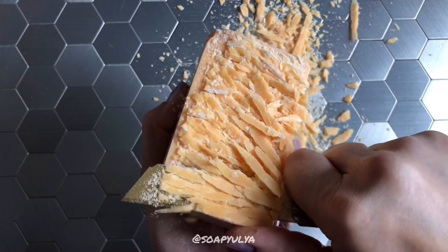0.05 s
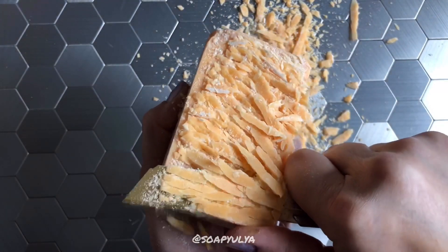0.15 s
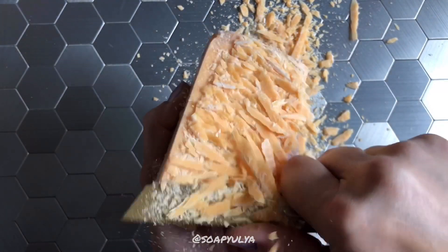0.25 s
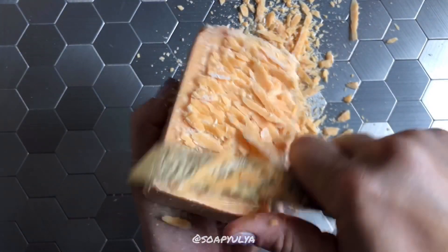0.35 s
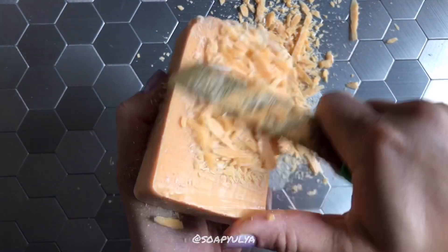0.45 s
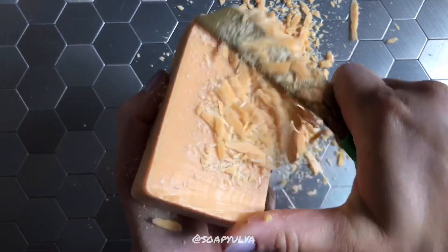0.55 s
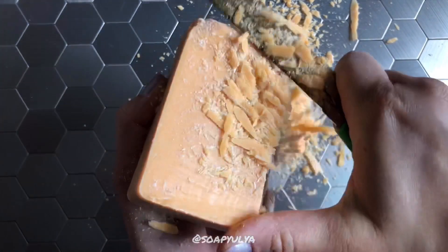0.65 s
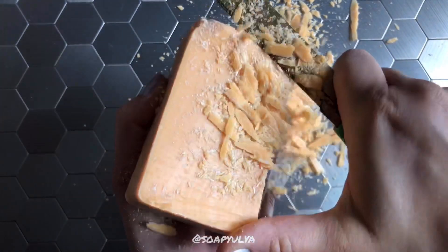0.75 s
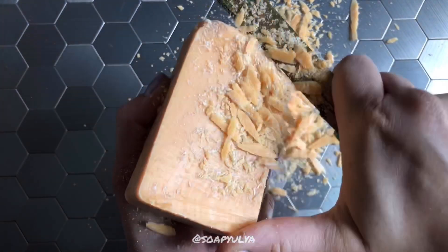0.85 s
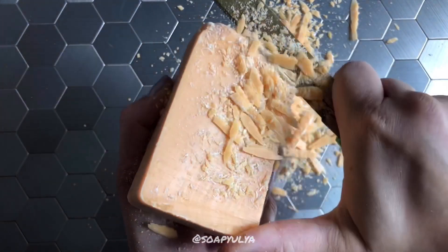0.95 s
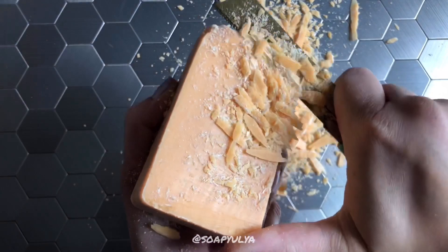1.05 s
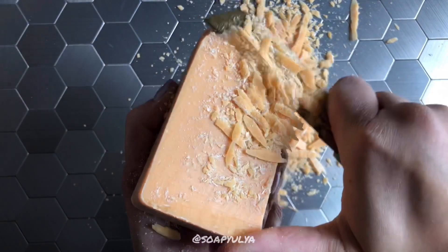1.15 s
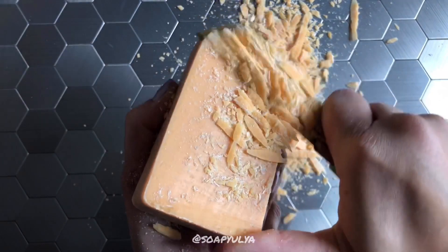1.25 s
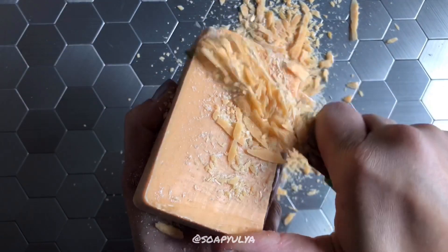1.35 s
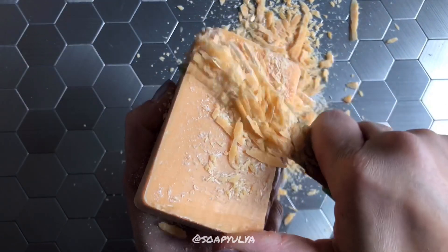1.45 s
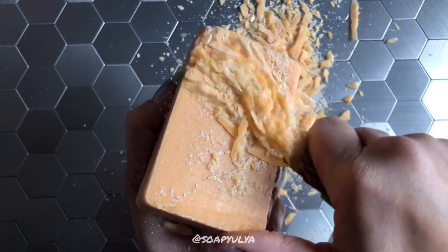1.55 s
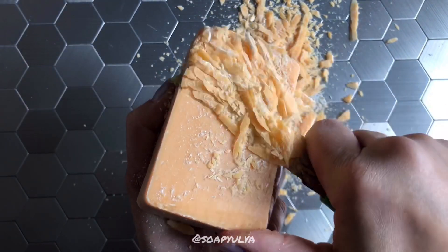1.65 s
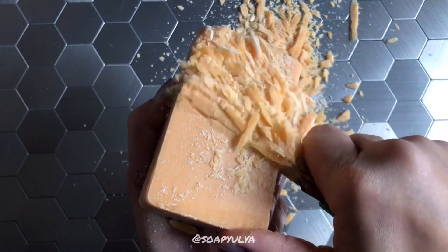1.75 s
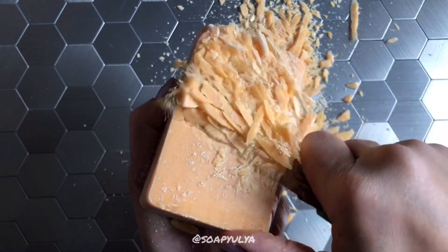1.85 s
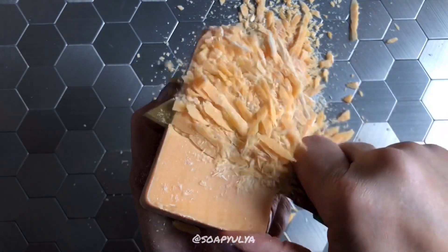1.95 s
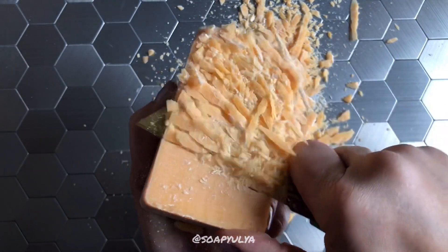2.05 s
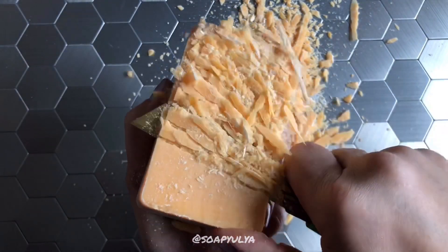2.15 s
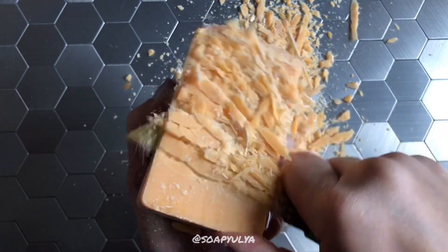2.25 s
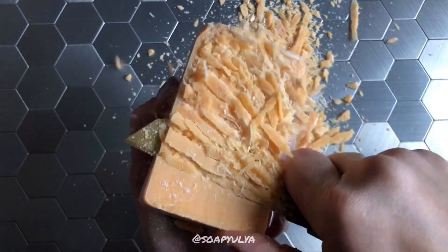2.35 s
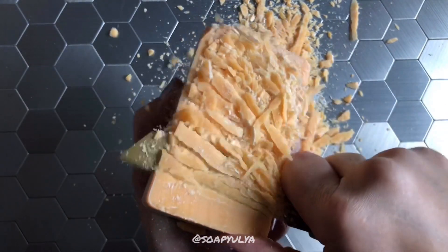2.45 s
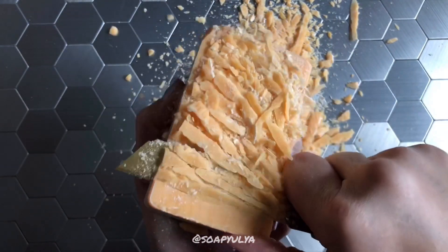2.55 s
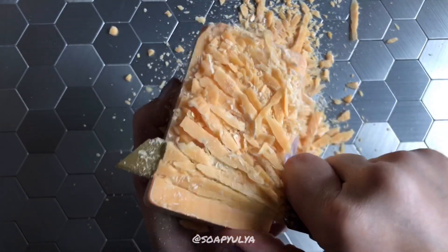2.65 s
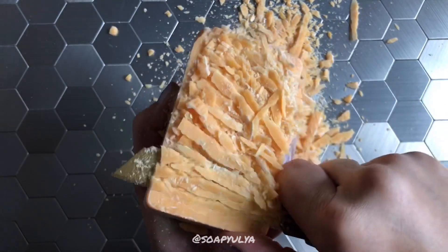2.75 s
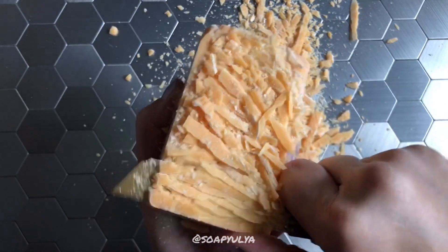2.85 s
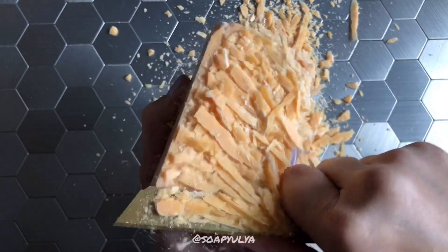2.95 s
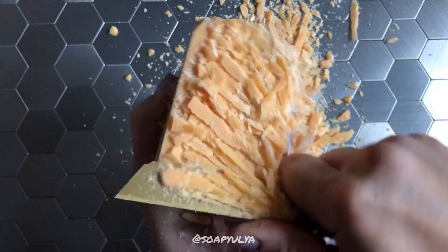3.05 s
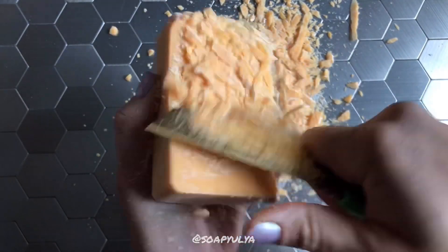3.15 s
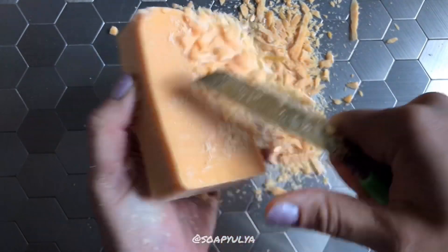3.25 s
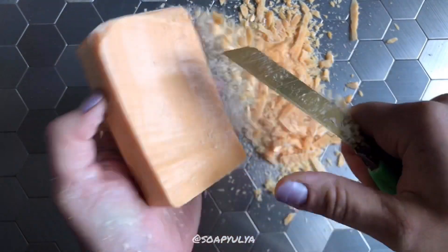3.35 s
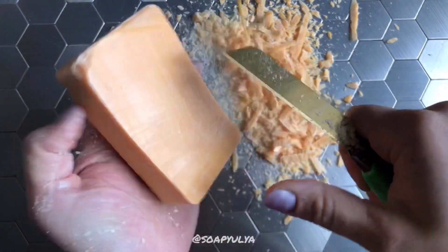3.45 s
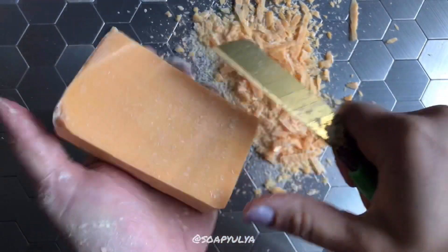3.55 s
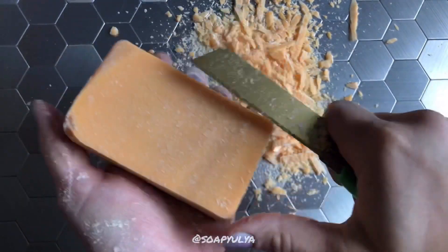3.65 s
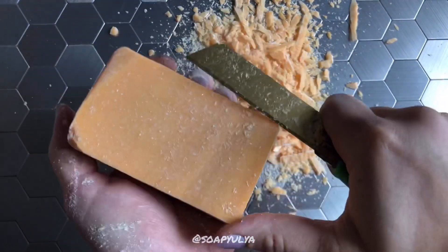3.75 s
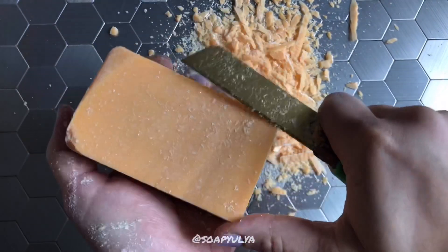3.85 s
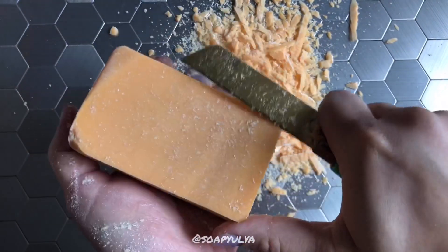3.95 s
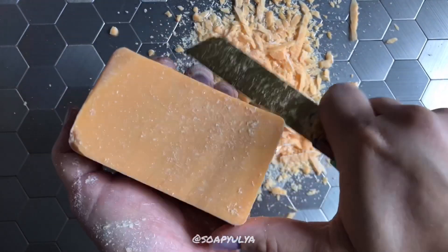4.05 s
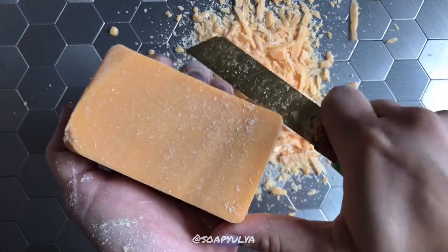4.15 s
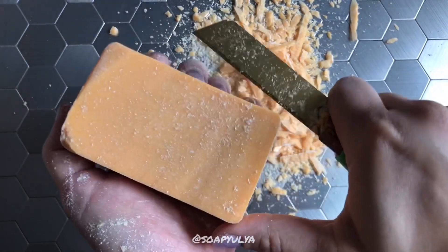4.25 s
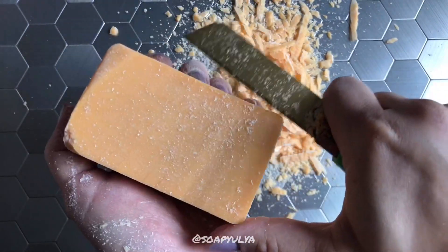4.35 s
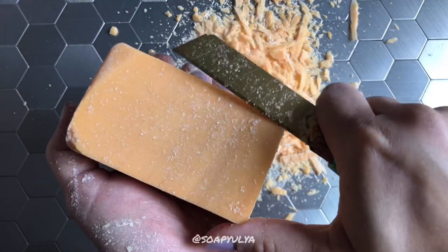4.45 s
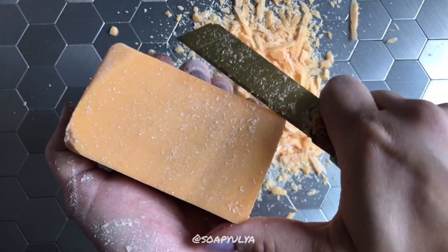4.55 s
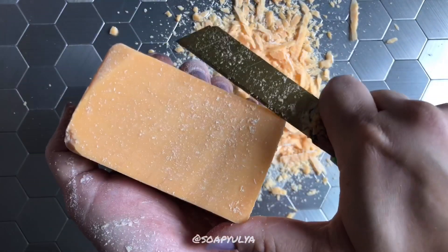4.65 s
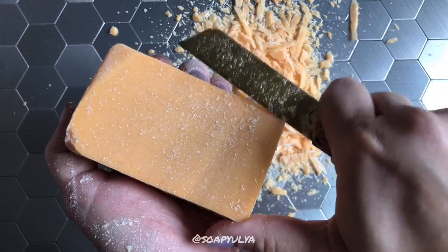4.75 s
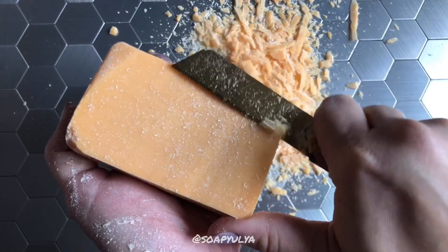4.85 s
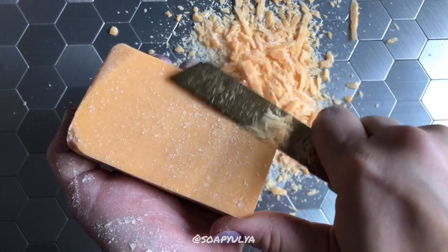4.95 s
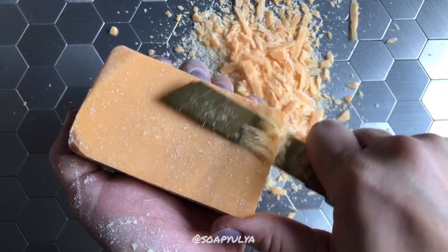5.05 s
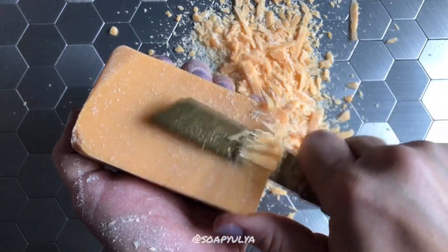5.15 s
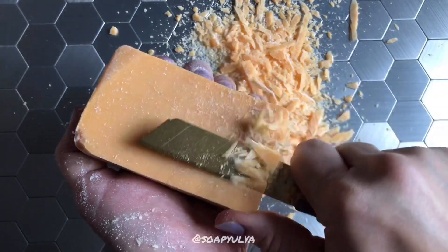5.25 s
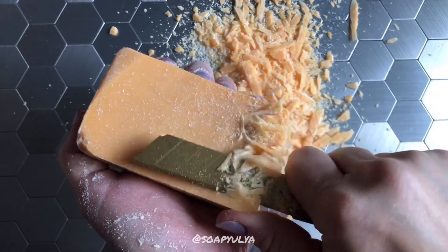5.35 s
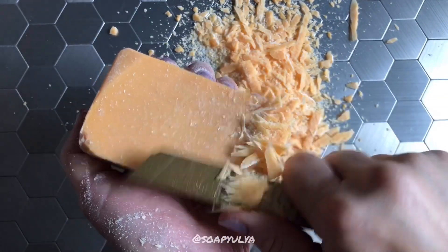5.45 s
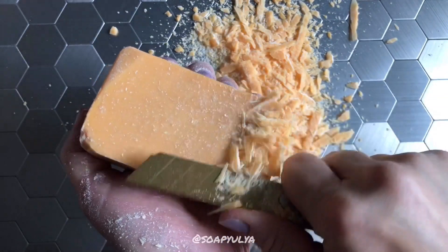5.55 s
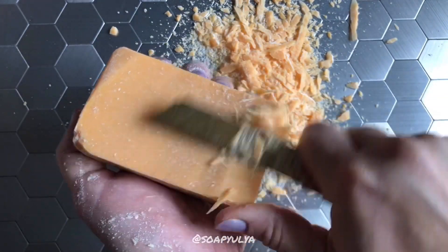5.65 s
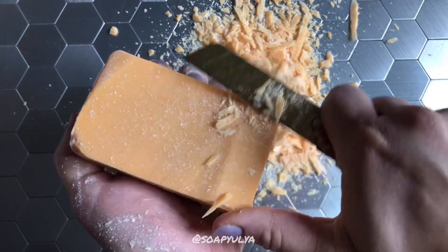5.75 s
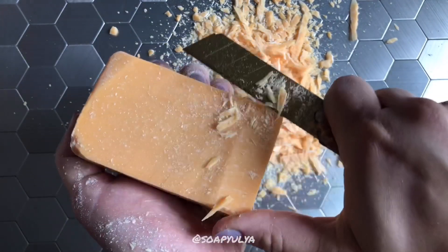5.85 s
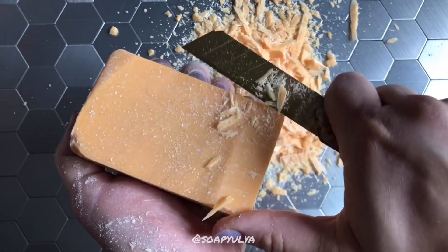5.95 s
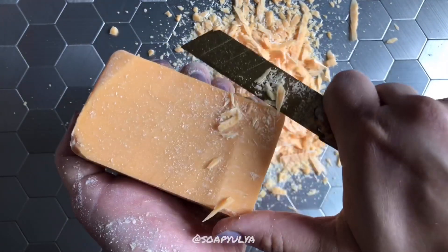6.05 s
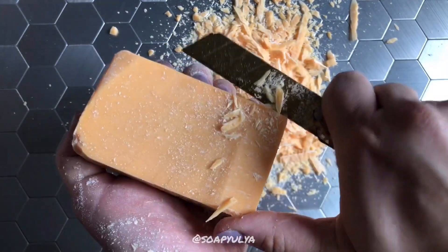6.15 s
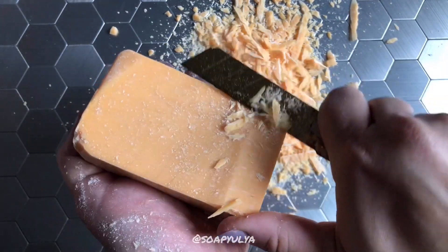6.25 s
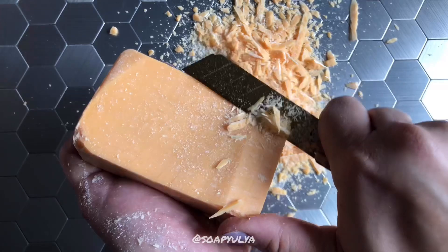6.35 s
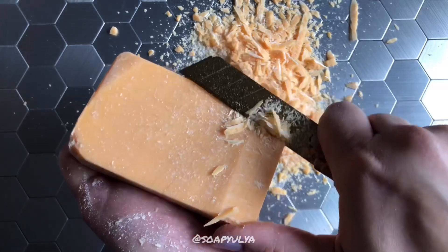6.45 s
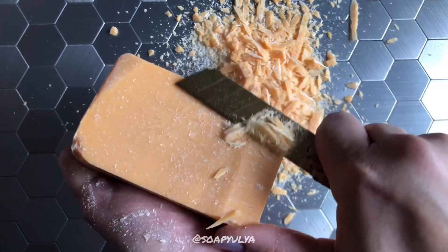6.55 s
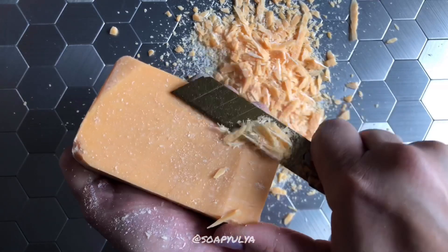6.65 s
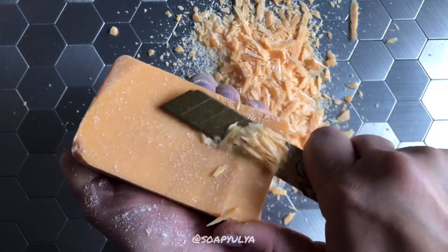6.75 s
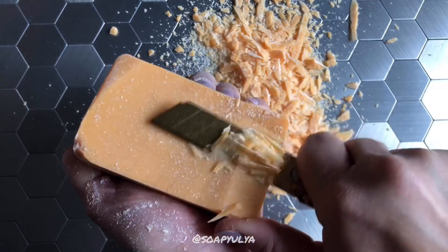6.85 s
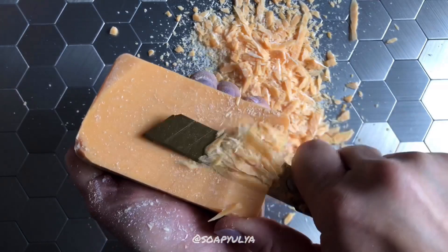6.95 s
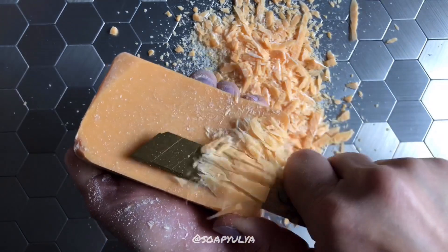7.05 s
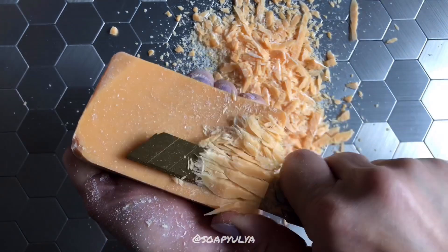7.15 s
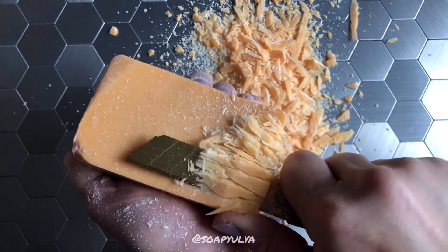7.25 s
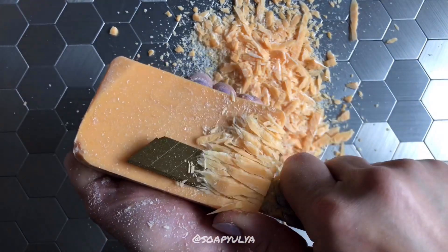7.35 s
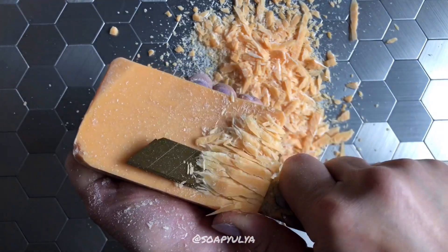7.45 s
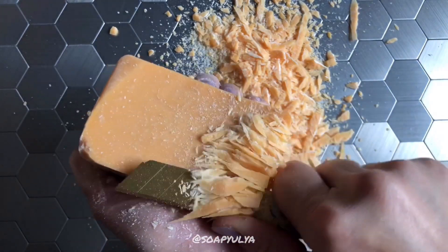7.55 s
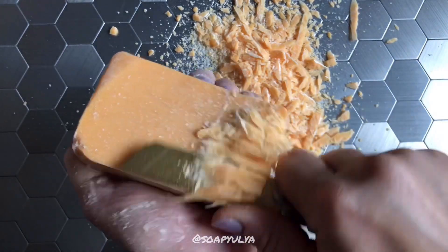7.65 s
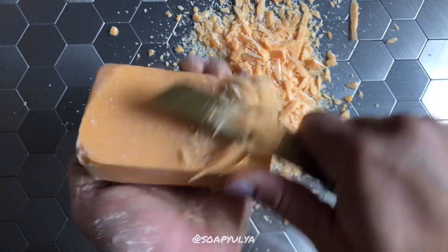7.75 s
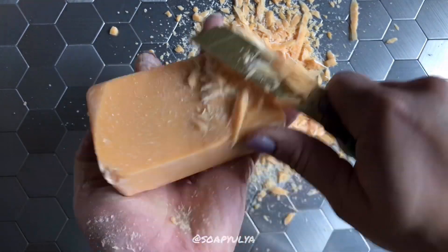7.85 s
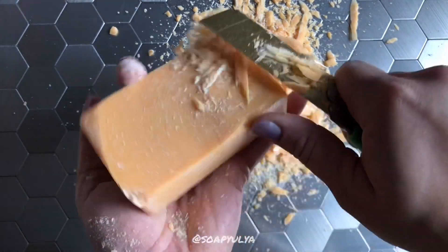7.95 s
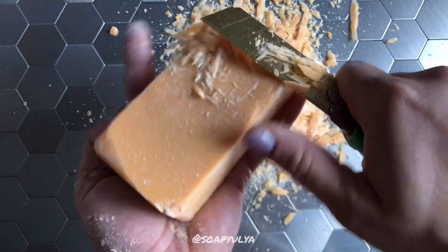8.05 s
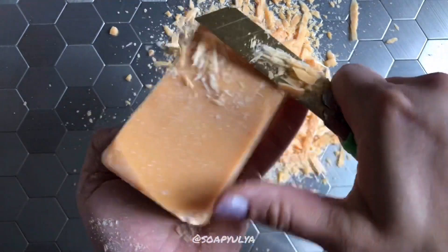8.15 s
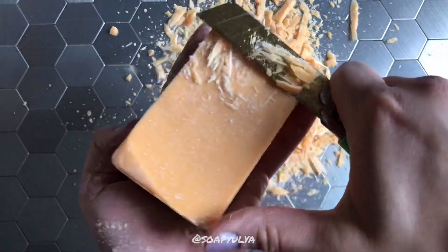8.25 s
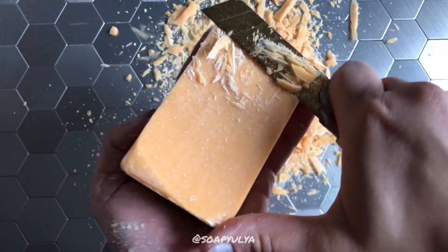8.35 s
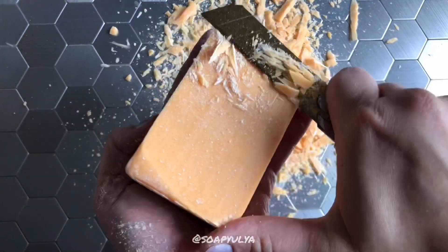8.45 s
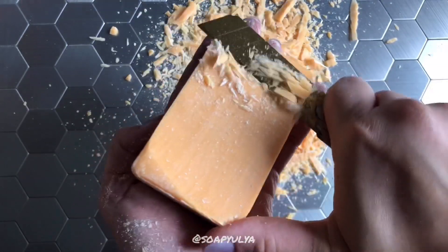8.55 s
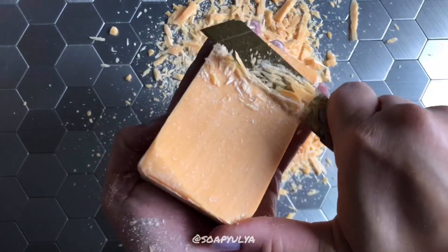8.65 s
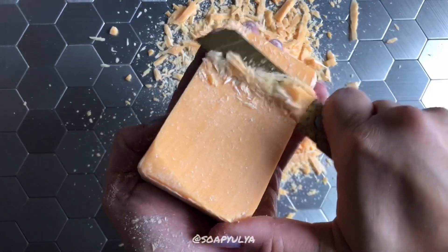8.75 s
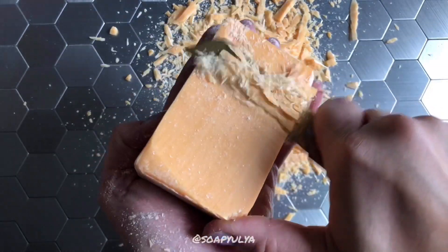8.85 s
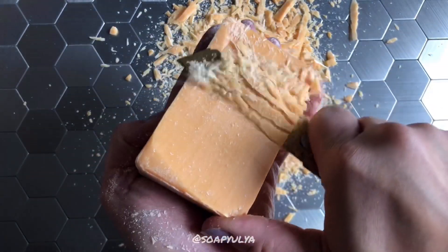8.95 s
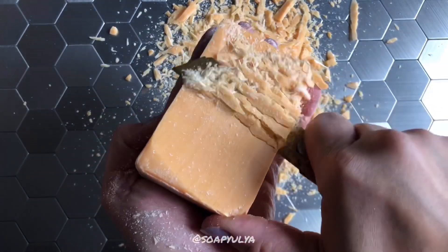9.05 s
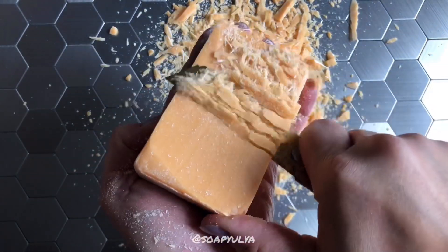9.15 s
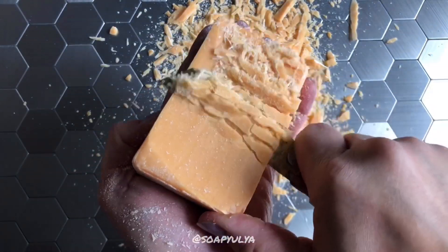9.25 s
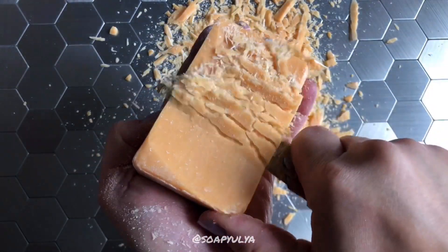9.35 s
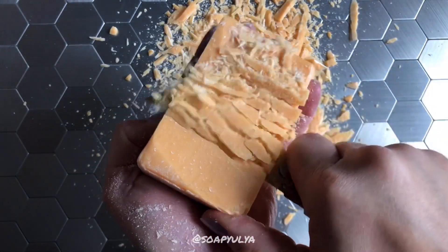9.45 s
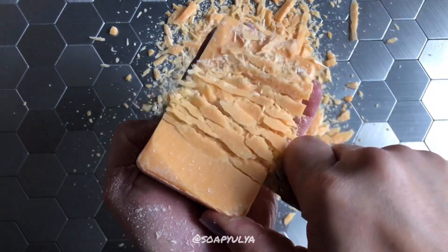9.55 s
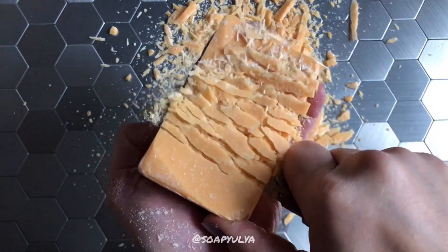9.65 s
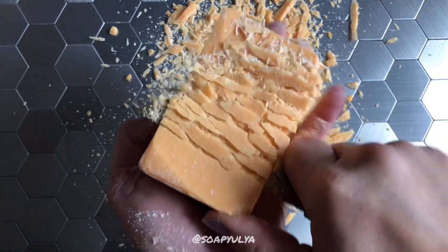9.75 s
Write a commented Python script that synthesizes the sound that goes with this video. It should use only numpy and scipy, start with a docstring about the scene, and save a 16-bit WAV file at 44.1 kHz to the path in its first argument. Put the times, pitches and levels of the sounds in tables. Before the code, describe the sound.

Close, dry and detailed: brittle soap snaps in clusters of tiny sharp cracks, coloured by a short metallic blade ring. Gritty scraping and falling crumbs fill the strokes; between them are swishing flake sweeps, light taps and dull hand rubs. Three main crackling passages are separated by quiet gaps, with faint arm thuds, a brief low hum and a very short room reflection behind.

```python
"""A quiet room, microphone close to a hard, dry soap bar that a thin steel blade shaves.
The soap lets go in short cracks: bursts of tiny fractures, heard through the soap and the ringing blade.
Between them come scraping grit, ticking flakes, quick rasping sweeps and dull rubs of the hands.
Behind are a low noise murmur, soft thuds of the arms and a wavering sine hum that comes and goes.
The walls add a short noise tail to the knife, mixed from two by a slowly wandering angle."""
import sys
import numpy as np
from scipy import signal
from scipy.fft import rfft, irfft, next_fast_len
from scipy.io import wavfile
from scipy.ndimage import uniform_filter1d, map_coordinates

SR = 44100
rng = np.random.default_rng(int(sys.argv[2]) if len(sys.argv) > 2 else 0)


def waveform_to_disk(signal):
    """Save audio, clipped to [-1, 1], as 16-bit WAV at the path in sys.argv[1]."""
    frames = np.transpose(np.atleast_2d(signal))
    scaled = np.clip(frames, -1, 1) * 32767
    samples = np.round(scaled).astype(np.int16)
    wavfile.write(sys.argv[1], SR, samples)


N = 432180

# Spectrum of the quiet room, relative: [f/Hz, density/dB per Hz]
ROOM_SPECTRUM = [(15, -66), (25, -38), (75, -14), (107, -7.5), (189, -3), (283, -6), (435, -12.5),
                 (526, -11.5), (746, -15), (1180, -22.5), (12300, -36), (14500, -30.5), (15700, -42.5)]
# Slow course of the room noise: [t/s, level/dB]
ROOM_LEVEL = [(0.0, -60), (2.02, -57), (4.37, -62.5), (4.97, -61.5), (7.56, -64), (8.05, -63.5), (9.8, -61)]
# Two low notes the room favours: [f/Hz, width/Hz, level/dB]
ROOM_BOOM = [(188.5, 3.3, 4.5), (284, 17, -9)]
# Dull thuds, stronger while the arms work hard; overlapping rows add: [from t/s, to t/s, level/dB]
ARM_THUDS = [(-.2, 10, -69.5), (1.45, 3.2, -70.5), (4.9, 5.4, -66.5), (6.4, 7.4, -67.5), (8.95, 9.4, -70.5)]
# When the hum is heard: [from t/s, to t/s, level/dB]
HUM_SPANS = [(-.2, 0.82, -62), (1.32, 2.1, -60.5)]
# Decay of the room's answer: [f/Hz, time to fall 60 dB/s]
WALL_DECAY = [(500, 0.18), (2000, 0.22), (5000, 0.091), (14000, 0.11)]
# Palms and fingers shifting on the bar: [from t/s, to t/s, pitch f/Hz, level/dB before the fades]
GRIP_SHIFTS = [(.49, 0.58, 443, -56.5), (0.732, 0.822, 420, -49.5), (0.879, 0.919, 480, -53),
               (1.527, 1.6, 300, -56), (2.73, 2.8, 209, -48.5), (3.284, 3.333, 410, -55.5),
               (3.377, 3.5, 470, -53), (3.461, 3.553, 208, -52.5), (4.94, 5.048, 480, -60.5),
               (5.918, 5.996, 405, -54), (6.388, 6.438, 540, -58), (8.001, 8.5, 200, -61.5),
               (8.078, 8.2, 442, -61), (8.275, 8.444, 565, -58), (8.884, 8.933, 326, -56.5)]

# Flat of the blade sweeping over flakes, force levels before the envelope:
# [from t/s, to t/s, grit level/dB, low, middle and high ring level/dB, whistle level/dB]
FLAKE_SWEEPS = [(0.406, 0.462, -61, -56.5, -58.5, -58, -57.5), (0.47, 0.548, -45, -48, -44, -52.5, -43.5),
                (0.561, 0.655, -60, -65.5, -47, -64.5, -51), (0.756, 0.833, -51.5, -63, -52, -68, -66.5),
                (3.183, 3.247, -48, -63, -66, -77, -55), (3.398, 3.535, -49, -54, -62, -69, -57),
                (4.86, 4.97, -52, -55, -51, -52, -78), (5.15, 5.174, -39, -48, -46, -32, -64),
                (5.707, 5.79, -48, -57.5, -43, -42, -50), (6.263, 6.41, -59, -58, -49, -52, -82),
                (8.28, 8.329, -58, -51, -43, -70, -76)]
# Strokes of the edge over the bar, force levels before the grit trims:
# [from t/s, firmest t/s, to t/s, grit level/dB, low, middle and high ring level/dB]
EDGE_STROKES = [(0.454, 0.524, .74, -51, -52, -45.5, -65), (0.686, 0.794, .98, -55, -55, -56, -70),
                (1.02, 1.38, 1.74, -51.5, -51.5, -51.5, -48.5), (1.758, 1.904, 2.3, -56.5, -67, -73, -51),
                (2.3, 2.454, 2.84, -62, -65, -67, -60.5), (2.825, 2.986, 3.15, -62, -57, -58.5, -53.5),
                (3.15, 3.452, 3.74, -58, -69, -65, -77), (4.056, 4.113, 4.2, -66, -63, -62, -72),
                (4.85, 5.15, 5.66, -58, -58, -65, -54), (5.702, 5.74, 5.88, -56.5, -50.5, -50, -60),
                (5.87, 5.942, 6.06, -61.5, -74, -73, -66), (6.247, 6.34, 6.52, -68, -63, -64, -60),
                (6.568, 6.68, 7.0, -57, -55, -54.5, -48), (6.86, 7.104, 7.27, -57, -53.5, -67, -49.5),
                (7.302, 7.378, 7.46, -67, -59, -72, -58), (7.568, 7.604, 7.74, -60, -64, -62.5, -65),
                (7.7, 7.817, 8.04, -62.5, -73, -66, -72), (8.057, 8.11, 8.72, -60.5, -70, -57.5, -81),
                (8.66, 8.98, 9.18, -57, -57, -60.5, -53.5), (9.11, 9.464, 9.8, -60.5, -58.5, -64, -52)]
# Soap cracking under the edge, levels before the crack offsets:
# [t/s, peak level/dB, low ring level/dB, middle ring level/dB, time to full strength/ms]
SOAP_CRACKS = [(0.082, -32.5, -45.5, -47, 4.5), (1.1729, -41, -44, -42.5, 6.9),
               (1.2243, -35.5, -35.5, -42, 5.5), (1.2943, -40.5, -41.5, -37, 5),
               (1.3827, -36.5, -40, -46, 6.8), (1.466, -31.5, -45, -45, 4.8), (1.515, -33.5, -46, -46, 5.6),
               (1.5594, -30.5, -35, -31, 4.3), (1.5989, -34, -49, -44, 4.5), (1.6618, -37, -47, -45, 6.2),
               (1.7694, -40, -48.5, -54, 7.4), (1.7905, -24.5, -36.5, -31.5, 3.8),
               (1.8532, -34, -43, -37, 6.4), (1.8836, -28.5, -36.5, -35, 4.3), (1.9134, -30, -55, -41, 1.6),
               (1.9311, -19, -33, -28, 2), (1.9787, -23.5, -39, -34.5, 6.6), (2.1015, -32, -40, -50, 5.1),
               (2.144, -32, -44.5, -38.5, 5.7), (2.2409, -37, -52, -59, 4.1),
               (2.3318, -10.5, -37, -39, 4.4), (2.3674, -32, -48, -39, 6.4), (2.4112, -38, -43, -36, 3.3),
               (2.4913, -26, -43, -39, 5.8), (2.567, -33.5, -54, -54, 7.9), (2.7294, -31, -41.5, -37, 3.3),
               (2.836, -35, -57, -52, 5.7), (2.9044, -39, -66, -66, 3.5), (2.9336, -33, -50, -57, 3.4),
               (2.968, -28, -53, -52, 5.6), (2.9938, -24.5, -36.5, -53, 4.8), (5.0108, -36, -46, -50, 5.6),
               (5.0569, -29, -39, -36, 6.1), (5.1081, -23.5, -37, -36, 5.1), (5.1452, -27.5, -41, -51, 4.5),
               (5.2066, -20, -40, -33, 4.7), (5.2682, -17.5, -39, -33, 5.6), (5.3115, -31.5, -43, -39, 7.9),
               (5.3764, -19, -37, -33, 5.3), (5.4331, -36, -47, -43, 5.1), (5.4893, -27, -40, -43, 5),
               (5.7471, -35.5, -46.5, -34, 8.8), (5.976, -31.5, -54, -53, 3.4),
               (6.6269, -31, -48, -50, 3.8), (6.777, -28, -44, -44, 4), (6.795, -21, -40.5, -35, 6.3),
               (6.8632, -31.5, -43.5, -44, 4.5), (6.9087, -30.5, -43, -45, 6.7),
               (6.9476, -30, -42, -45, 3.5), (6.9656, -31, -46.5, -44, 9.9), (7.0326, -25, -46, -51, 6.5),
               (7.0947, -19.5, -38.5, -40.5, 5.6), (7.3488, -40.5, -54, -66, 4.9),
               (8.6276, -44.5, -52, -43.5, 4.6), (8.7215, -43.5, -53, -47, 5),
               (8.8598, -38.5, -45, -42, 5.1), (8.892, -32.5, -38.5, -43, 11.3),
               (8.9637, -23.5, -31.5, -37, 5.8), (9.0323, -28.5, -37.5, -42, 6.2),
               (9.0774, -32.5, -39, -48, 3.7), (9.2183, -30.5, -41.5, -38, 5.3),
               (9.277, -34, -47.5, -48, 4.2), (9.3472, -30.5, -49, -43, 6.5), (9.4295, -35, -49, -44, 4.8),
               (9.4853, -21, -39, -33, 2.8), (9.5477, -22.5, -45, -39.5, 4.3), (9.62, -36.5, -58, -62, 4.8),
               (9.7224, -31, -50, -57, 7.7)]
# Ticks of flakes and light taps of the blade, levels before the tick offsets:
# [t/s, peak level/dB, low ring level/dB, middle ring level/dB]
FLAKE_TICKS = [(0.0692, -31, -54, -71), (0.4752, -22.5, -49, -41), (0.5029, -28.5, -40, -32),
               (0.614, -30, -60, -34), (0.6374, -35, -55, -44), (0.7521, -34, -40, -46),
               (0.8845, -47, -53, -64), (1.0176, -47, -75, -55), (1.0804, -44, -49, -48.5),
               (2.0285, -30.5, -42, -37), (2.1932, -39, -51, -47), (2.5341, -28.5, -49, -41),
               (2.6063, -30, -48, -43), (2.6504, -31, -52, -58), (2.6703, -34.5, -52, -49),
               (2.793, -40, -64, -67), (3.1816, -33.5, -49, -51), (3.2116, -47, -52, -41),
               (3.2186, -28, -54, -50), (3.247, -35.5, -55, -60), (3.3054, -50.5, -65, -51),
               (3.3383, -43, -66, -51), (3.3675, -37, -52, -58), (3.3971, -30.5, -55, -48),
               (3.4199, -34, -42, -38.5), (3.4639, -27, -46, -45), (3.6017, -44, -40.5, -45.5),
               (3.794, -53, -61, -71), (3.8731, -52, -64, -73), (3.951, -65, -62, -61),
               (4.1239, -27.5, -44.5, -26.5), (4.1675, -40.5, -43, -48), (4.2815, -51.5, -48, -60),
               (4.5124, -52.5, -44, -49.5), (4.6322, -29.5, -61, -38.5), (4.9851, -31, -45, -47),
               (5.0836, -32.5, -45, -41), (5.3323, -29, -45, -33.5), (5.6291, -36.5, -64, -59),
               (5.7262, -32.5, -46, -44), (5.8252, -34, -52, -53), (5.8364, -51.5, -44, -34.5),
               (5.9114, -34.5, -70, -43), (5.9335, -28, -59, -58), (6.039, -44, -50, -45.5),
               (6.2811, -52, -61, -41), (6.345, -34, -43, -39), (6.3616, -38, -47, -34),
               (6.4135, -33, -37, -48), (6.4564, -37.5, -49, -51), (6.5959, -37, -50, -53),
               (7.3174, -52, -55, -73), (7.3983, -41, -51, -64), (7.4594, -56, -58, -70),
               (7.637, -34.5, -49, -39.5), (7.784, -45, -40, -53.5), (8.0895, -37, -46, -45),
               (8.1332, -33.5, -66, -58), (8.1768, -41.5, -43.5, -36.5), (8.2184, -51, -46, -47),
               (8.29, -42, -42, -35.5), (8.3156, -40, -47, -38), (8.3759, -47.5, -36, -51),
               (8.3974, -50, -41, -59), (8.4682, -66, -49.5, -48), (8.5375, -44, -64, -47),
               (8.6124, -41, -54, -51), (9.1505, -35, -60, -64), (9.209, -30.5, -45, -47),
               (9.4688, -26.5, -36, -37), (9.7101, -37, -62, -61)]
# Blade breaking out through the rim at the end of a cut, force levels:
# [t/s, soap level/dB, low, middle and high ring level/dB, time to full strength/ms]
RIM_BREAKOUTS = [(.2745, -23.5, -31.5, -55, -24.5, 5.5), (3.0055, -30, -62, -64, -35, 6.6),
                 (5.56, -32.5, -36.5, -40, -31, 4.5), (7.1429, -30.5, -44, -48, -23, 4.76),
                 (7.585, -31, -40, -50, -21.5, 5.5)]

# Breaking soap without the blade, relative: [f/Hz, density/dB per Hz]
SOAP_SPECTRUM = [(410, -7), (700, -9.5), (1180, -5.5), (2750, -1.5), (4620, 2), (5840, 2), (15700, -6.5)]
# Dull knock of flakes and fingers on the bar: [f/Hz, width/Hz, level/dB]
CRUMB_MODES = [(970, 2100, -5), (2620, 1100, 4.5)]
# Bright rustle of loose flakes and dust: [f/Hz, width/Hz, level/dB]
DUST_MODES = [(13200, 3700, 0)]
# Blade modes, low group: [f/Hz, width/Hz, level/dB]
LOW_MODES = [(901, 143, -4), (1770, 151, 5.5), (2292, 86, -7)]
# Low group when the blade only touches: [f/Hz, width/Hz, level/dB]
FREE_LOW_MODES = [(916, 130, -0.5), (2040, 120, 3)]
# Blade modes, middle group: [f/Hz, width/Hz, level/dB]
MIDDLE_MODES = [(3140, 340, 22), (3396, 120, 15), (4010, 290, 5.1), (9060, 250, 0.5)]
# Middle group when the blade only touches: [f/Hz, width/Hz, level/dB]
FREE_MIDDLE_MODES = [(2230, 410, -9.5), (3358, 120, 7), (3500, 260, -1.5)]
# Blade modes, high group: [f/Hz, width/Hz, level/dB]
HIGH_MODES = [(5490, 310, -0.5), (6042, 590, 14), (6980, 840, -4.5)]
# High group when only the edge is in the soap: [f/Hz, width/Hz, level/dB]
SHALLOW_HIGH_MODES = [(5994, 300, 4.5), (6750, 300, 0.5), (7750, 930, -9.5)]
# Free tip of the blade: [f/Hz, width/Hz, level/dB]
WHISTLE_MODES = [(9400, 200, 3.5), (10210, 300, -5)]
# Blade away from the soap: [from t/s, to t/s, share/0-1]
LIFTED_SPANS = [(.72, 1.0, 0.96), (3.28, 3.8, 0.98), (7.73, 8.55, 0.69)]
# Blade only touching: [from t/s, to t/s, share/0-1]
FREE_SPANS = [(.5, .85, 0.88), (3.95, 4.8, .9), (5.7, 6.48, 0.35)]
# Shallow cutting: [from t/s, to t/s, share/0-1]
SHALLOW_SPANS = [(4.65, 8.15, 0.7)]

LOW_CUT_HZ, TOP_HZ = 36, 15800
# Offsets on the listed levels, for the soap and for each ring
CRACK_SNAP_DB, CRACK_LOW_DB, CRACK_MIDDLE_DB, CRACK_HIGH_DB = -15, -3, -4.5, -7
TICK_SNAP_DB, TICK_RING_DB, TICK_HIGH_DB, TICK_RISE_MS = -12, -3, -26.5, 2.68
SNAP_GROWS = 0.85  # dB of snap per dB of crack: big cracks go more into the blade
CRUMBLE_DB, CRUMBLE_T60_S = -25, 0.32  # grit that trails each break
ENDS_DB, ROUND = -22, 1.34  # pressure at both ends of a stroke, roundness of its top
REST_DB = -85.5  # loose grit between strokes, before the grit trims
GRIT_TRIM_DB = [[1.5], [-1.5], [-1.5], [-1.5]]  # soap, then low, middle and high ring
DUST_DB = -11  # against the force on the soap
WALLS_DB = -10.5  # against the direct knife


def amp(db):
    """Gain of a level in dB."""
    return 10 ** (np.asarray(db) / 20)


def unit(x):
    """Scaled to rms 1, over all rows together."""
    return x / np.sqrt(np.mean(x ** 2) + 1e-20)


def along(points, hz):
    """Values of (f/Hz, value) points on a log frequency axis."""
    f, value = np.transpose(points)
    return np.interp(np.log(hz + 1), np.log(f + 1), value)


def spans(rows):
    """Each (from, to, value) row switches its value on and off over 60 ms; overlaps add."""
    t = np.arange(N) / SR
    return sum(value * np.clip(np.minimum(t - start, end - t) / .06 + .5, 0, 1) for start, end, value in rows)


def levels(rows):
    """Gains from (from t/s, to t/s, level/dB) rows."""
    return spans([(start, end, amp(db)) for start, end, db in rows])


def wobble(rate):
    """A smooth random curve, rate knots a second."""
    coarse = np.arange(0, N + 32, 32)
    knots = rng.standard_normal(int(N * rate / SR) + 4)
    return np.interp(np.arange(N), coarse, map_coordinates(knots, [coarse * rate / SR]))


def filtered(x, response):
    """x through a response of frequency that keeps the power of white noise."""
    m = next_fast_len(N + SR // 2)
    gain = response(np.fft.rfftfreq(m, 1 / SR))
    gain = gain / np.sqrt(np.mean(abs(gain) ** 2))
    return irfft(rfft(x, m) * gain, m)[:N]


def modes(table):
    """The causal response of a group of resonances, neighbours in opposite sign."""
    def response(f):
        return sum((-1) ** k * amp(db) * 1j * f * width / (centre ** 2 - f * f + 1j * f * width)
                   for k, (centre, width, db) in enumerate(table))
    return response


def fractures(rate, spread_db, size):
    """Tiny breaks at random moments, rate a second, a few much larger than the rest, rms 1."""
    broken = rng.random(size) < rate / SR
    out, count = np.zeros(size), broken.sum()
    excess = np.minimum(rng.exponential(size=count), 4)
    out[broken] = rng.standard_normal(count) * amp(spread_db * excess)
    return unit(out)


def murmur():
    """Low room noise that swells slowly, with two favoured low notes on their own swell."""
    t, level_db = np.transpose(ROOM_LEVEL)
    room_db = np.interp(np.arange(N) / SR, t, level_db)
    air = filtered(rng.standard_normal(N), lambda hz: amp(along(ROOM_SPECTRUM, hz)))
    boom = filtered(rng.standard_normal(N), modes(ROOM_BOOM))
    return amp(room_db + 0.98 * wobble(4.8)) * air + amp(room_db - 11 + 3.3 * wobble(4.9)) * boom


def arm_thuds():
    """The working arms thud dully: lumpy noise through a doubled low resonance."""
    lumps = unit(amp(3.9 * wobble(14)) * rng.standard_normal(N))
    return levels(ARM_THUDS) * filtered(lumps, lambda hz: modes([(70, 50, 0)])(hz) ** 2)


def hum():
    """A sine near 99.5 Hz whose pitch and level waver."""
    phase = 2 * np.pi * np.cumsum(99.5 + 0.97 * wobble(2.4)) / SR
    return levels(HUM_SPANS) * amp(1.5 * wobble(5)) * np.sin(phase)


def room():
    """All that sounds behind the work."""
    return murmur() + arm_thuds() + hum()


def walls(x):
    """The room's answer: two noise tails, each frequency dying at its own speed, mixed by a wandering angle."""
    turn = np.pi * wobble(4)
    answer = np.zeros(N)
    for part in (np.cos(turn), np.sin(turn)):
        hz, t, z = signal.stft(rng.standard_normal(SR // 3), SR, nperseg=256)
        decay = amp(-60 * t / along(WALL_DECAY, hz)[:, None])
        tail = signal.istft(z * decay, SR, nperseg=256)[1]
        delayed = np.pad(x * part, (200, 0))  # samples
        answer += signal.fftconvolve(delayed, tail / np.linalg.norm(tail))[:N]
    return answer


def hands():
    """Each shift of the grip is a short, dull, lumpy rub: band-passed fractures that fade in and out."""
    out = np.zeros(N + SR)
    for start, end, hz, db in GRIP_SHIFTS:
        size = round(max(end - start, .01) * SR)
        band = signal.butter(2, [hz * 0.6, hz * 1.3], "band", fs=SR, output="sos")
        rub = unit(signal.sosfilt(band, fractures(600, 1.0, size=size)))
        out[round(start * SR):][:size] += amp(db) * rub * np.sqrt(np.hanning(size))
    return out[:N]


def sweeps():
    """Forces of the blade brushing flakes aside: a dense rasp that starts quickly and trails off."""
    t, push = np.arange(N) / SR, np.zeros((5, N))
    for start, end, *levels_db in FLAKE_SWEEPS:
        corners = [start - .008, start + 0.032, end - .01, end + 0.013]
        push += amp(levels_db)[:, None] * np.interp(t, corners, [0.00067, 0.64, 0.45, 0.0])
    own_db = 0.72 * np.array([wobble(50) for row in range(5)])
    rasp = amp(3.4 * wobble(90) + own_db) * fractures(6000, 1.6, size=(5, N))
    return push * unit(rasp)


def pressure():
    """Each stroke presses harder up to its firmest moment and eases off, for the soap and each ring."""
    t, out = np.arange(N) / SR, np.full((4, N), amp(REST_DB))
    for start, firm, end, *levels_db in EDGE_STROKES:
        # 0 at the firmest moment, 1 at both ends
        away = np.where(t < firm, (firm - t) / (firm - start), (t - firm) / (end - firm))
        fade = np.clip(4 - 3 * away, 0, 1)  # to silence just beyond the ends
        out += amp(levels_db)[:, None] * amp(ENDS_DB * away ** ROUND) * fade
    return out


def crumbling(events):
    """Loosened grit keeps falling for a moment after every break: decaying powers that add."""
    kicks, t = np.zeros((4, N)), np.arange(SR // 2) / SR
    for s, *levels_db, rise_ms in events:
        kicks[:, round(s * SR)] = amp(2 * np.array(levels_db))
    decay = amp(2 * (CRUMBLE_DB - 60 * t / CRUMBLE_T60_S))
    power = signal.fftconvolve(kicks, decay[None], axes=1)[:, :N]
    return np.sqrt(abs(power))


def grit(level):
    """Force of the dragging edge: light rubbing under clumps of small breaks, partly separate for each path."""
    own_db = 3 * np.array([wobble(60) for row in range(4)])
    clumps = amp(4 * wobble(45) + 3 * wobble(140) + own_db)
    grains = fractures(2500, 1.9, size=N) + 1.12 * fractures(1600, 3.5, size=(4, N))
    rubbing = 0.22 * rng.standard_normal(N)
    return level * unit(rubbing + unit(clumps * grains))


def breaks():
    """Cracks, ticks and break-outs as (t/s, force level/dB on soap, low, middle, high ring, rise/ms)."""
    cracked = [(s, -30.5 + SNAP_GROWS * (db + 30) + CRACK_SNAP_DB, low + CRACK_LOW_DB,
                middle + CRACK_MIDDLE_DB, db + CRACK_HIGH_DB, rise_ms)
               for s, db, low, middle, rise_ms in SOAP_CRACKS]
    ticked = [(s, db + TICK_SNAP_DB, low + TICK_RING_DB,
               middle + TICK_RING_DB, db + TICK_HIGH_DB, TICK_RISE_MS)
              for s, db, low, middle in FLAKE_TICKS]
    return cracked + ticked + RIM_BREAKOUTS


def cracks(events):
    """Force on soap and blade: each break fades in quickly, swells, snaps off and crumbles on weakly."""
    lead = SR // 40
    force, t = np.zeros((4, N + SR)), np.arange(-lead, SR // 12) / SR
    for s, *levels_db, rise_ms in events:
        u = np.maximum(t / (max(rise_ms, .2) / 1000) + 0.63, 0)  # 1 at full strength
        swell = (u * np.exp(1 - u)) ** 4.62
        fade_in, crumble = amp(-26.5 + 60 * t / 0.03), amp(-27.5 - 60 * t / 0.067)
        shape = swell + np.where(u > 1, crumble, fade_in)
        # breaks common to all four paths, and breaks of each path alone
        burst = fractures(9000, 2.0, size=len(t)) + 0.98 * fractures(9000, 2.5, size=(4, len(t)))
        burst = shape * burst
        burst *= np.linalg.norm(shape) / np.linalg.norm(burst, axis=1, keepdims=True)
        force[:, round(s * SR):][:, :len(t)] += amp(levels_db)[:, None] * burst
    return force[:, lead:lead + N]


def shared(force, share, table, other):
    """A force split by power between two groups of modes."""
    share = np.clip(share, 0, 1)
    return filtered(force * np.sqrt(1 - share), modes(table)) + filtered(force * np.sqrt(share), modes(other))


def blade_rings(low, middle, high, lifted, free):
    """Three groups of blade modes; lifting weakens the low and middle ones, contact changes their pitches."""
    touch = np.sqrt(1 - lifted)
    ring = shared(low * touch, free, LOW_MODES, FREE_LOW_MODES)
    ring += shared(middle * touch, free, MIDDLE_MODES, FREE_MIDDLE_MODES)
    return ring + shared(high, spans(SHALLOW_SPANS), HIGH_MODES, SHALLOW_HIGH_MODES)


def loose_flakes(snap, low, middle, lifted, free):
    """With the blade lifted the forces knock dully on the bar and rustle brightly in the dust."""
    knock = filtered((low + middle) * np.sqrt(lifted), modes(CRUMB_MODES))
    loose = np.sqrt(np.clip(lifted + .3 * free, 0, 1))  # light touching stirs some dust too
    return knock + amp(DUST_DB) * filtered(snap * loose, modes(DUST_MODES))


def shaving():
    """The forces sound through the soap itself, the loose flakes, the blade rings and the blade tip."""
    *brush, tip = sweeps()
    events = breaks()
    scrape = grit(pressure() + crumbling(events)) * amp(GRIT_TRIM_DB)
    snap, low, middle, high = cracks(events) + scrape + brush
    lifted, free = np.clip(spans(LIFTED_SPANS), 0, 1), spans(FREE_SPANS)
    soap = filtered(snap, lambda hz: amp(along(SOAP_SPECTRUM, hz)))
    flakes = loose_flakes(snap, low, middle, lifted, free)
    rings = blade_rings(low, middle, high, lifted, free)
    return soap + flakes + rings + filtered(tip, modes(WHISTLE_MODES))


def uneven_colour(x, patchy_db):
    """Random patches of gain in time and frequency make the colour of x uneven."""
    z = signal.stft(x, nperseg=256)[2]
    field = uniform_filter1d(rng.standard_normal(z.shape), size=4, axis=0)  # along frequency
    field = uniform_filter1d(field, size=6, axis=1)  # along time
    return signal.istft(z * amp(patchy_db * unit(field)), nperseg=256)[1][:N]


def scene():
    """Room and hands behind the close knife and its answer from the walls."""
    knife = uneven_colour(shaving(), patchy_db=2.5)
    return (room() + hands() + amp(WALLS_DB) * walls(knife) + knife)[None]


def record(dry):
    """The microphone loses the deepest bass and the recorder keeps nothing above its band limit."""
    m = next_fast_len(N + SR)
    hz = np.fft.rfftfreq(m, 1 / SR)
    bass_loss = hz ** 2 / np.hypot(hz ** 2, LOW_CUT_HZ ** 2)
    return irfft(rfft(dry, m) * (hz < TOP_HZ) * bass_loss, m)[:, :N]


dry = scene()
out = record(dry)
waveform_to_disk(out)
```